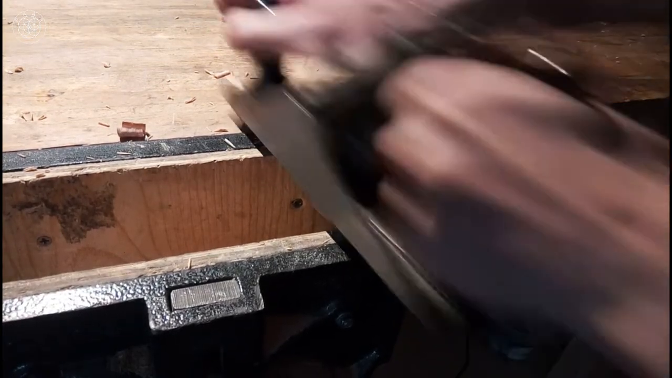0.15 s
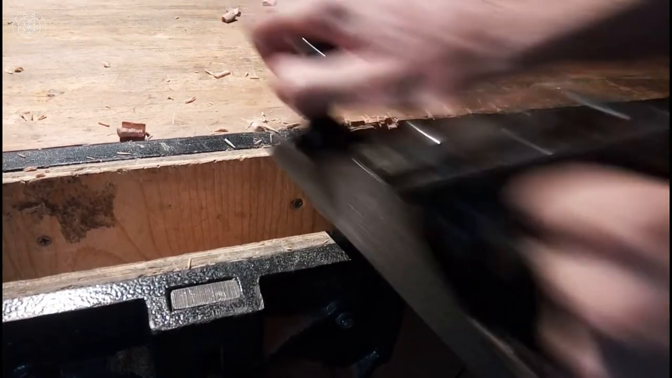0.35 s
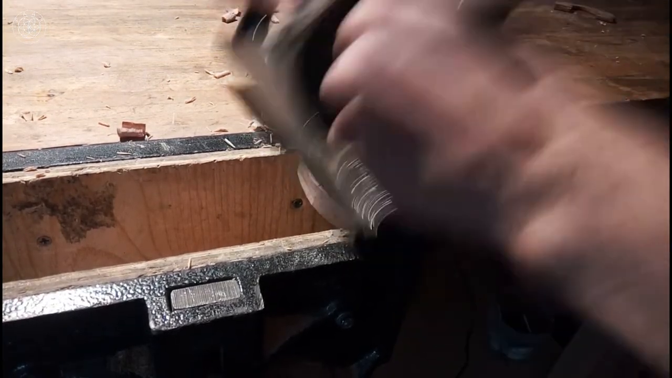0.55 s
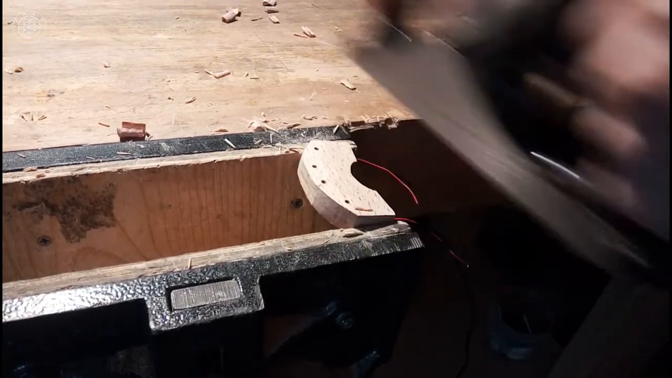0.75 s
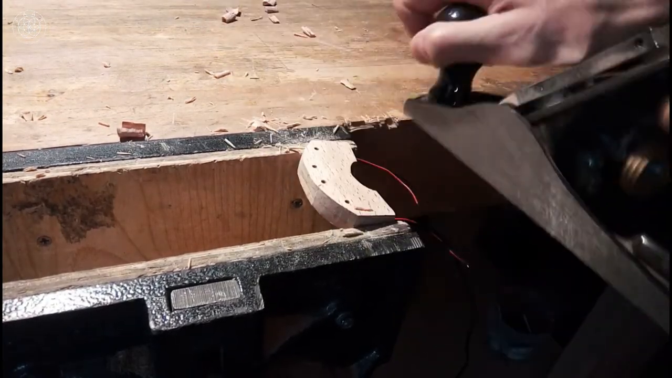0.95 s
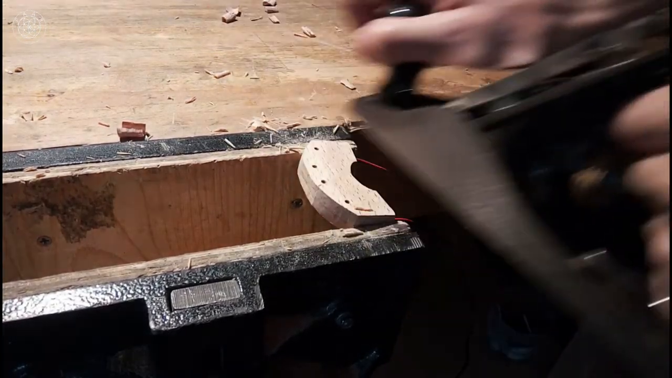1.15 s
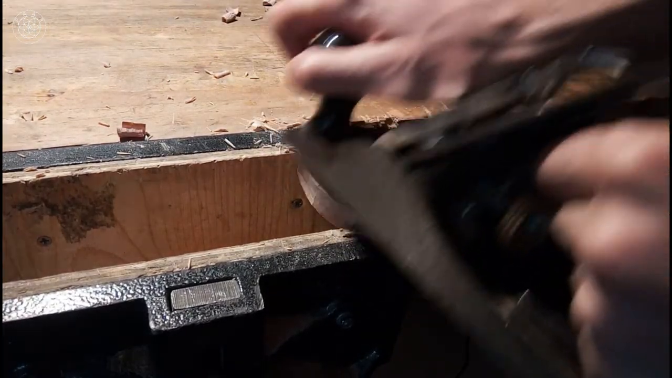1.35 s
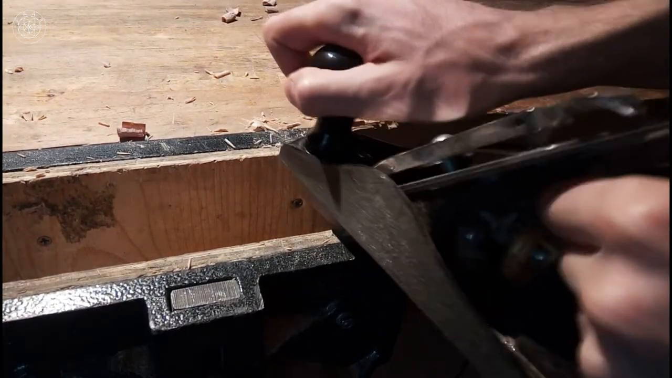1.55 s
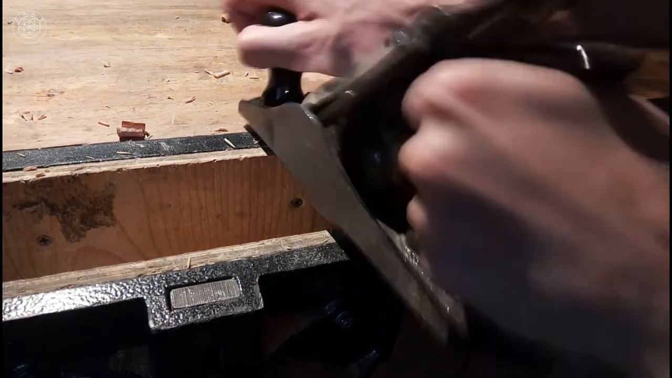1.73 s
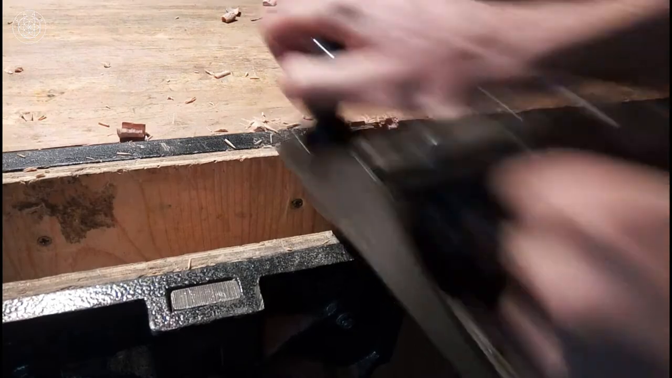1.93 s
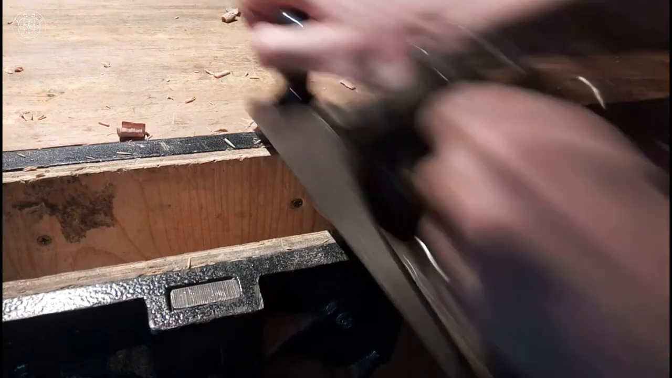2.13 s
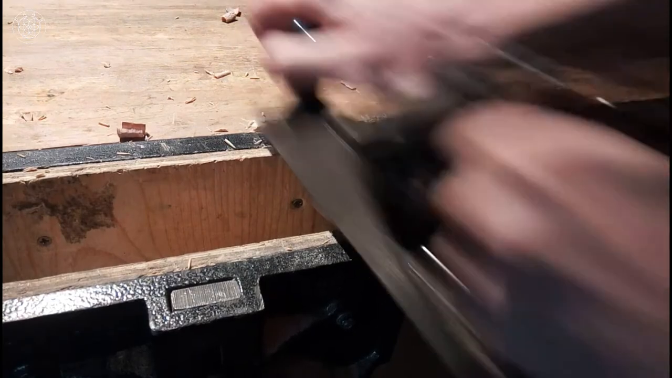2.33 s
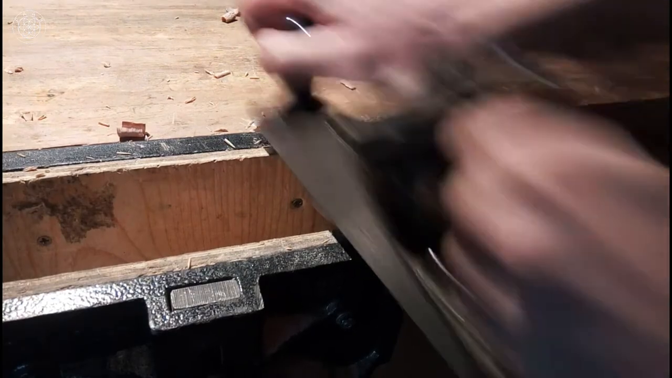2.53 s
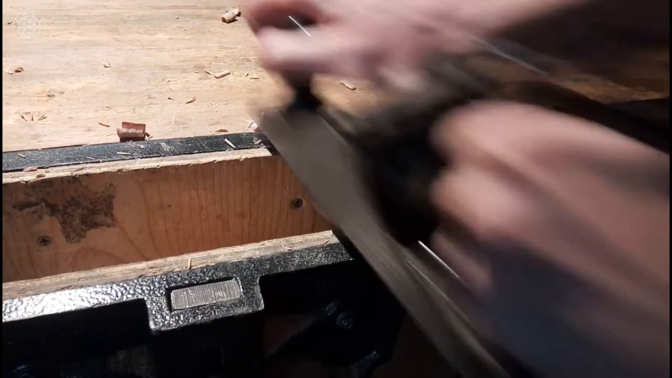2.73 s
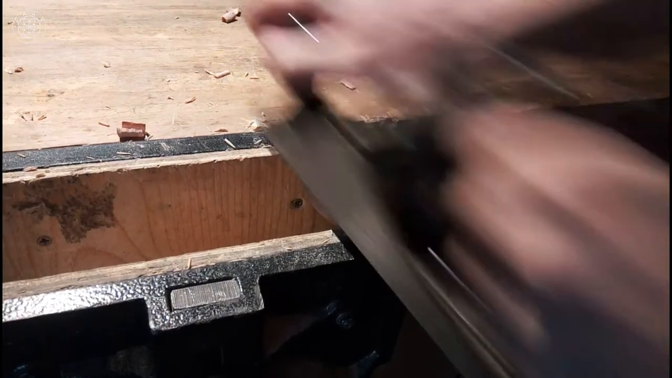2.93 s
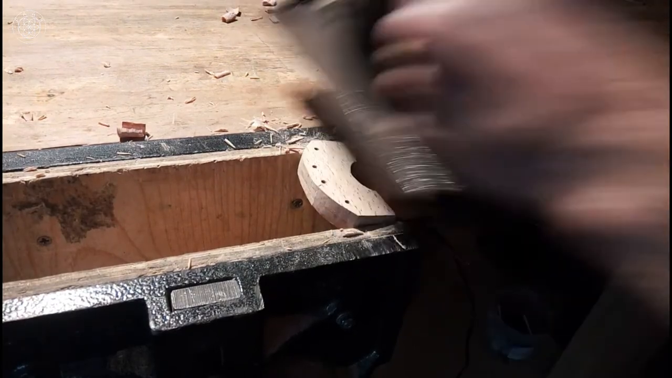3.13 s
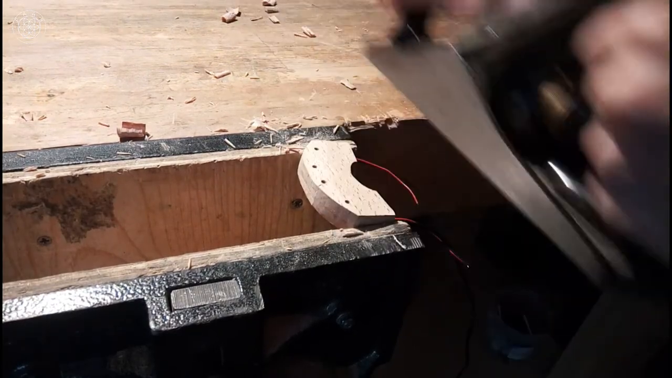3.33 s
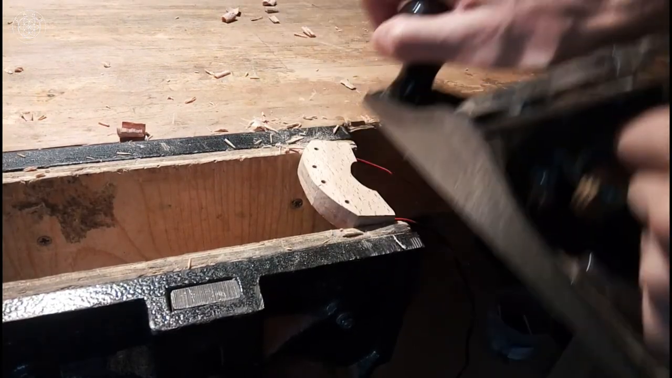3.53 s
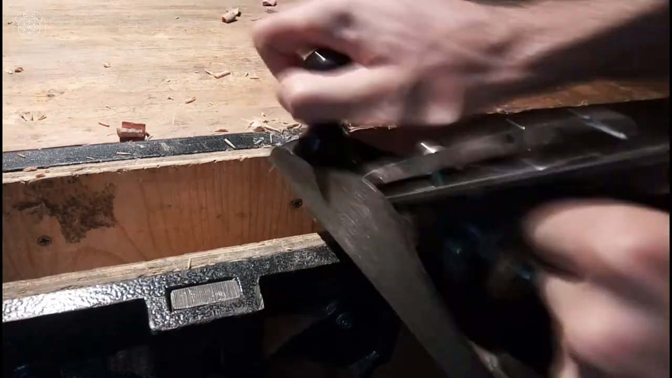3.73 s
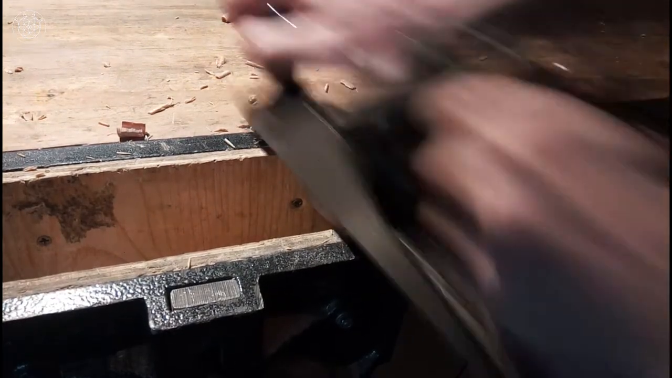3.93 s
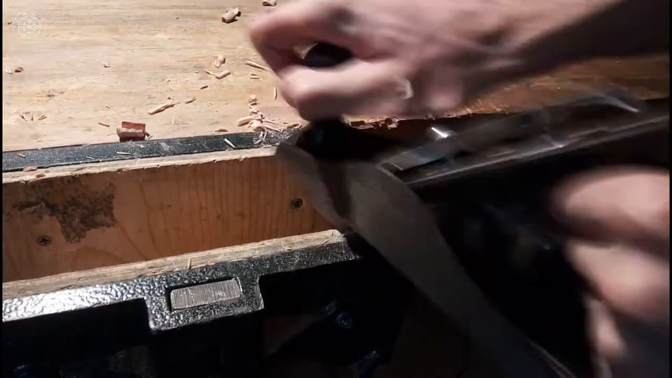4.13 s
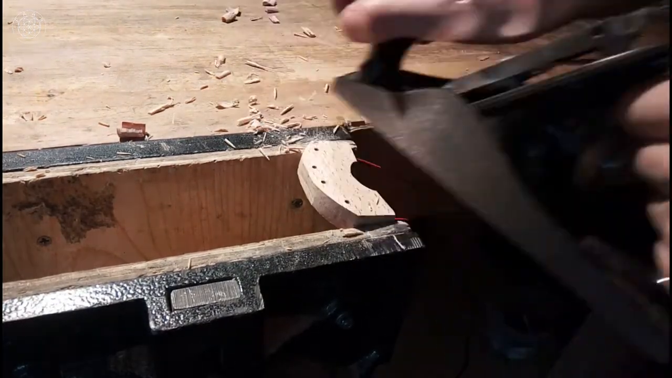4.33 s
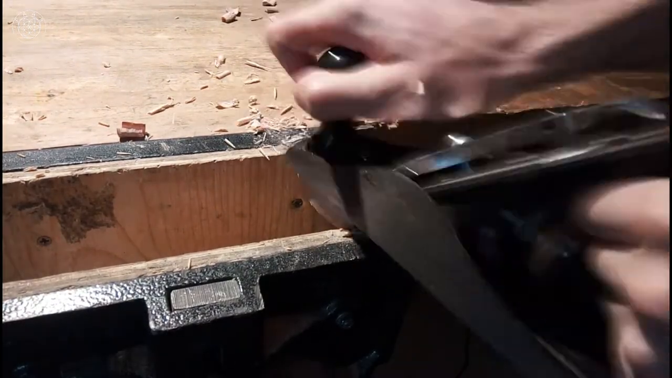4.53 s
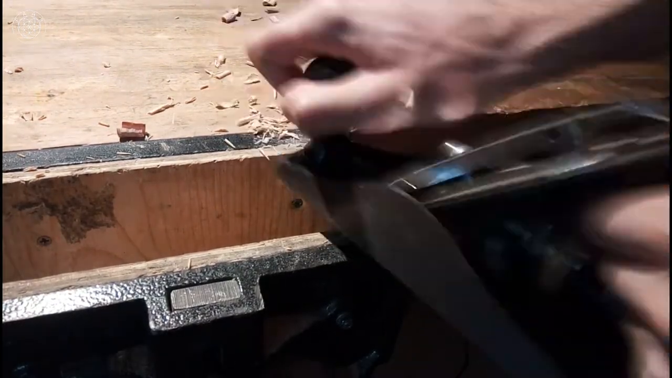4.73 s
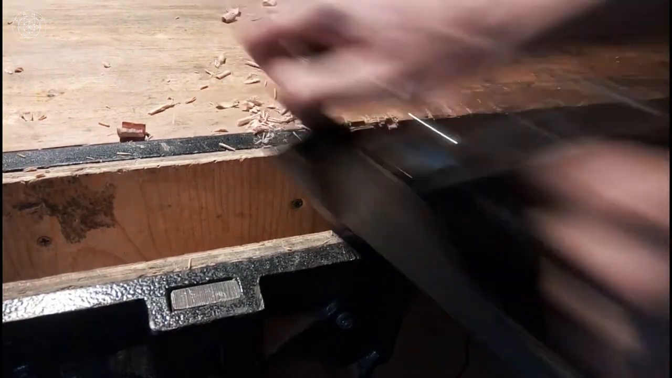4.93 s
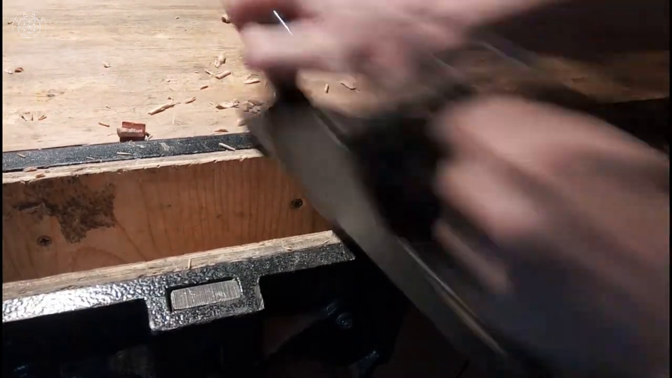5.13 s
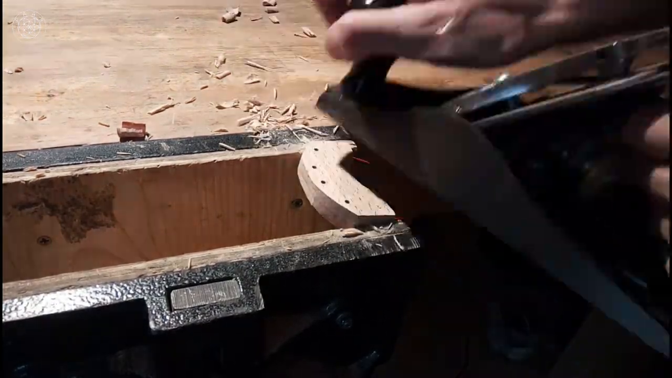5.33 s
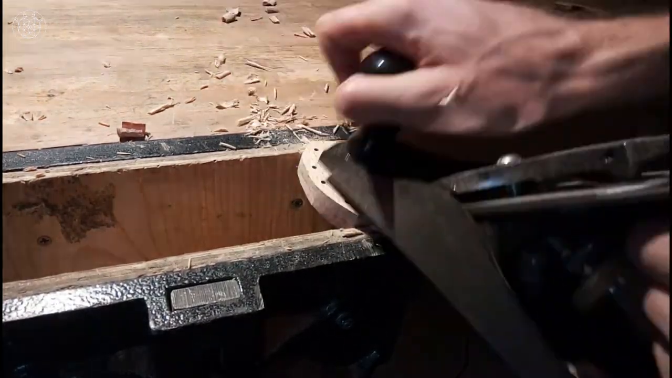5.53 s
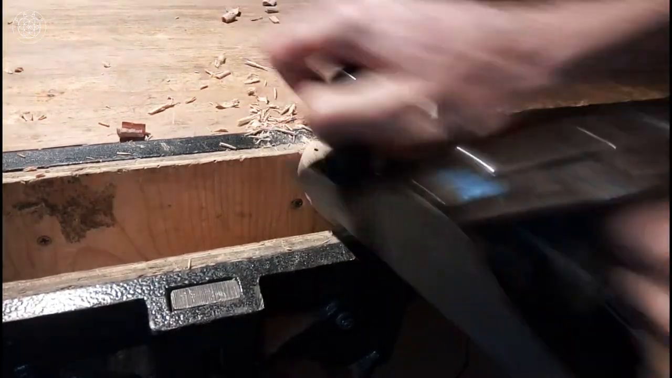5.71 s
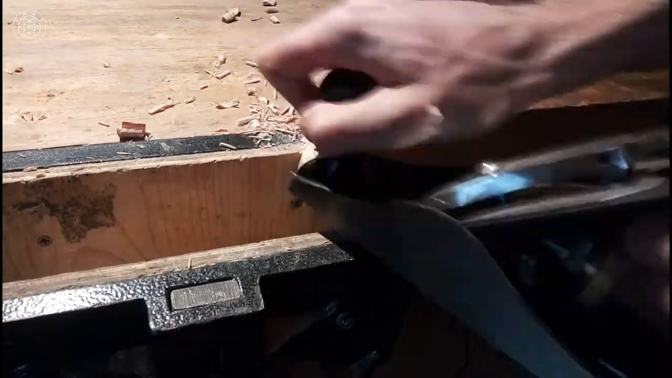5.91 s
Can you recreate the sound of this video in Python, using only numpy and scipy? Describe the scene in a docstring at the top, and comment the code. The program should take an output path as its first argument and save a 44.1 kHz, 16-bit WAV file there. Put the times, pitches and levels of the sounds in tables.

```python
"""Hand tools work a block of wood clamped in a bench vise. First come heavy strokes to and fro, dull
and roomy: the steel bites, rings and shakes the bench, and once the tool knocks on the block.
Then, from about 3.6 s, close and dry, a file chatters over the wood in short strokes, its teeth
slipping some seventy times a second and ringing its own modes. Along the way the wood catches and
tears with a hiss, over a faint bed of room tone."""
import sys
import numpy as np
from scipy import signal
from scipy.fft import rfft, irfft
from scipy.io import wavfile
from scipy.ndimage import uniform_filter1d

SR = 44100
rng = np.random.default_rng(int(sys.argv[2]) if len(sys.argv) > 2 else 0)


def log_audio(samples):
    """Write samples as a 16-bit WAV file to the path given in sys.argv[1]."""
    # one column per channel
    frames = np.atleast_2d(samples).T
    # limit to full scale, then quantise
    limited = np.clip(frames, -1, 1)
    pcm = np.round(limited * 32767).astype(np.int16)
    wavfile.write(sys.argv[1], SR, pcm)


N = 267687
T = np.arange(N) / SR

# Heavy passes over the block; decay_s is the t60 of bench and rumble, the block dies a little sooner:
# full_speed_s, hold_s, hiss_db, ring_db, block_db, bench_db, rumble_db, bench_lag_s, decay_s
HEAVY_PASSES = [(0, 0.0016, -32, -33.5, -44.5, -42.5, -55, 0.023, 0.86),
                (.175, 0.067, -47, -51.5, -45.5, -44, -49, 0.0088, 1.04),
                (0.408, .014, -32.5, -34.5, -47, -47, -55.5, 0.082, 1.3),
                (1.409, .01, -78, -57, -47.5, -36, -48.5, 0.016, 0.18),
                (1.654, 0.055, -48.5, -55.5, -53.5, -44, -59.5, .11, 0.63),
                (1.882, 0.091, -51, -55, -46, -43.5, -61, 0.03, 0.97),
                (2.131, 0.038, -42.5, -46, -47.5, -44.5, -54.5, 0.08, 1.2),
                (2.328, 0.083, -49.5, -56.5, -46.5, -44.5, -60.5, .004, 0.88),
                (2.567, 0.011, -37.5, -34.5, -44.5, -44.5, -55.5, 0.044, 1.8),
                (2.753, 0.073, -49.5, -52.5, -46, -53, -58, 0.012, 1.65),
                (2.964, 0.046, -42, -49.5, -47, -44.5, -48.5, .02, 0.17)]
# Steel biting or landing on the wood, with relative levels and a decay that each layer scales:
# start_s, hiss_db, ring_db, block_db, bench_db, rise_s, decay_s
STEEL_BITES = [(0.0034, -28, -51, -34.5, -43, 0.0039, 0.097),
               (0.1909, -65, -52.5, -37, -25.5, 0.0016, 0.13),
               (0.4052, -24, -36, -22.5, -32.5, 0.0034, 0.13),
               (1.4049, -45.5, -35, -21.5, -51, 0.0057, 0.13),
               (1.6604, -29.5, -54, -45, -62, 0.0018, 0.088), (1.717, -29, -27.5, -29, -41, 0.007, 0.29),
               (1.8503, -36.5, -43, -58, -72, 0.0042, 0.035), (1.9264, -35, -33, -39, -25.5, 0.0038, 0.067),
               (2.0427, -55, -44.5, -39, -35, 0.003, 0.15), (2.127, -23.5, -49, -49, -67, 0.0028, 0.36),
               (2.153, -44, -27, -33.5, -55, 0.0021, 0.32), (2.323, -78, -39, -29, -24, 0.0035, 0.12),
               (2.5621, -20, -47, -29, -35.5, 0.0013, 0.23), (2.7731, -61, -50, -40, -28.5, 0.0049, 0.27),
               (2.958, -19, -39, -39, -34, 0.0032, 0.13), (2.993, -55, -42, -27, -60, 0.0039, 0.072)]
# Resonances of the heavy tool, the bench and the file: pitch_hz, width_hz, level_db
STEEL_MODES = [(807, 18, 2), (1375, 28, -3), (1530, 30, -5), (1640, 36, 1), (1755, 25, -6), (1850, 18, -2),
               (1980, 20, -9), (2380, 40, -13), (2920, 50, -8), (3085, 40, -1), (3400, 70, 0),
               (3630, 60, -9), (3945, 35, -1), (4178, 45, -1), (4430, 50, -7), (4610, 35, -6),
               (5140, 60, -13), (5710, 60, -17), (5960, 90, -16), (6180, 90, -14), (7210, 68, -28),
               (8140, 80, -31)]
BENCH_MODES = [(83, 16, -4), (111, 20, -3), (179, 20, 0), (211, 18, 3), (257, 18, 2), (282, 16, 5),
               (339, 28, 2), (400, 28, 1), (452, 24, -1), (512, 24, 0), (641, 35, -1)]
FILE_MODES = [(1235, 40, -13), (1650, 90, -7), (2685, 95, -2.5), (3160, 105, -2.5), (4215, 110, 4.5),
              (4960, 190, -8), (5960, 170, -8), (7680, 110, -7), (7980, 90, -13), (8800, 130, -14),
              (9610, 100, -11), (9860, 120, -10), (11500, 90, -14), (12080, 140, -6), (15000, 300, -23)]
# Broad tone colour between the resonances: frequency_hz, level_db
HEAVY_COLOUR = [(25, -26), (100, -5), (270, -3), (550, -3), (800, -3.5), (1000, -12.5), (1600, -7.5),
                (2200, -16.5), (3000, -7), (4100, -6), (6600, -19), (7000, -34), (9000, -43.5),
                (16000, -49)]
FILE_COLOUR = [(25, -28), (270, -14), (624, -23.5), (1400, -15), (2000, -10), (2450, -5), (2900, -12),
               (3600, -4.5), (4600, -2.5), (6500, -8), (10800, -10), (12300, -5.5), (13300, -16),
               (15700, -19.5)]
# The tool's one knock on the block: start_s, level_db, pitch_hz, t60_s
TOOL_KNOCK = (1.4062, -23, 520, .035)
# Strokes of the file: land_s, lift_s, rasp_db, treble_offset_db, dip_before_grip_db
FILE_STROKES = [(3.608, 3.982, -46.5, -7.5, -10), (4.013, 4.291, -47, -8.5, -10),
                (4.332, 4.734, -47.5, -11.5, -6), (4.761, 5.023, -48, -10.5, -2),
                (5.073, 5.252, -47, -10.5, -3), (5.326, 5.491, -47.5, -10, -4),
                (5.507, 5.785, -46, -9.5, -31), (5.818, 5.989, -46.5, -12, -6), (6.022, 6.055, -71, -3, 3)]
# Strongest slips of the teeth: start_s, bright_ring_db, low_ring_offset_db, treble_offset_db
STRONG_SLIPS = [(3.6125, -28, -5, -3.5), (3.6276, -37.5, -15, 2.5), (3.6534, -34.5, -8, 2),
                (3.6838, -40, -15, 5), (3.72, -42, -16, 1), (3.7411, -41.5, -6, 8), (3.7507, -36, -2, -8),
                (3.779, -39.5, 1.5, 3), (3.8066, -34, -8, -1), (3.8348, -35.5, -1.5, -3),
                (3.849, -36, -14, 3), (3.8867, -37, -4, -5), (3.9022, -35, -6, 2.5), (3.912, -35, -6, -5),
                (3.9296, -39, 1, -11), (3.959, -34.5, -6, -5), (4.0152, -30.5, -2, 10),
                (4.0436, -39.5, 2, -16), (4.0855, -28.5, -10, -2.5), (4.1003, -36, -2, -7),
                (4.126, -38, 4.5, -3), (4.1638, -40, 2, 1), (4.1766, -37, -9, -3), (4.2336, -44, -1, 4),
                (4.247, -41.5, -2, 5), (4.2612, -34.5, -28, -2), (4.3341, -26, -4.5, 2.5),
                (4.3604, -41, -19, 4), (4.375, -38.5, -5, 1), (4.3855, -34, -1.5, -4),
                (4.4012, -39.5, 3, 0), (4.4412, -34, -6.5, -11), (4.457, -36, -8, -8), (4.4833, -39, 5, -8),
                (4.5126, -34, -10, -1), (4.5593, -40.5, 5, 2), (4.587, -38.5, -5, -4), (4.6117, -41, 1, -9),
                (4.6739, -49, 4.5, -28), (4.7106, -37, 0, -4), (4.7595, -34.5, 1, -9),
                (4.7761, -35, -5, -10), (4.803, -30.5, -8.5, -1.5), (4.8298, -40.5, -3, 9),
                (4.841, -36, -4, -8), (4.8703, -39.5, 2, 0.5), (4.903, -43.5, 6, 2), (4.9428, -43.5, 2, 0),
                (4.9728, -35.5, -3.5, -2), (5.0028, -37, 1.5, -2), (5.0747, -27, -4, -4),
                (5.1515, -45.5, 5, 5.5), (5.215, -32.5, -4, -2), (5.327, -32, -2.5, 2.5),
                (5.3589, -34.5, -14, -20), (5.4304, -38, -4, 1), (5.4453, -36, -22, 1),
                (5.5158, -37.5, -1.5, -11), (5.5448, -28.5, -9, -4), (5.59, -41, -16, -3),
                (5.62, -37, -22, 0), (5.6341, -32, -8, -0.5), (5.6466, -32.5, -2, -4), (5.6747, -31, -1, 2),
                (5.7036, -39, 5.5, 7.5), (5.735, -31.5, -3, -0.5), (5.752, -38.5, -3.5, 0),
                (5.8179, -29.5, -7, 2), (5.8322, -34, -5, -1), (5.8599, -45, 7.5, 7), (5.877, -39, -5, -21),
                (5.8918, -33.5, -2.5, -3), (5.9343, -35.5, 4, .5), (5.953, -32, -7, 1),
                (6.0296, -29, -5.5, -10.5)]
# Wood catching and tearing: start_s, length_s, level_db, centre_hz, width_octaves
WOOD_CATCHES = [(0.175, 0.0076, -41, 2300, 0.35), (2.32, 0.011, -44, 1940, 0.62),
                (2.771, 0.0061, -46, 1930, 0.6), (2.99, 0.012, -33.5, 4300, 0.37),
                (3.85, 0.058, -46, 5970, 0.52), (4.091, 0.035, -45.5, 4760, 0.53),
                (4.499, 0.075, -44, 5500, 1), (4.805, 0.067, -44.5, 5100, 0.81),
                (5.424, 0.047, -42.5, 4700, 0.6), (5.551, 0.028, -41.5, 1480, 0.81)]
# Reverb time of the workshop: frequency_hz, t60_s
SHOP_DECAY = [(100, 0.81), (700, 0.46), (1800, 0.033), (5000, 0.28)]
# Colour of the room tone, far and close: frequency_hz, level_db
FAR_ROOM_COLOUR = [(25, -32.5), (70, -14), (130, -14.5), (250, -16), (600, -21.5), (1500, -25),
                   (3000, -28.5), (6200, -33), (7000, -43.5), (9000, -46.5), (16000, -44.5)]
NEAR_ROOM_COLOUR = [(25, -46), (100, -25.5), (300, -21), (550, -21.5), (1500, -17.5), (3200, -17),
                    (7000, -27), (15000, -26)]
# Wavering low tones far off, a faint whistle up close: pitch_hz, width_hz, level_db
FAR_HUMS = [(161, 26, -71.5), (219.6, 6.1, -71.5)]
NEAR_WHISTLE = [(3170, 70, -77)]

HEAVY_LIFTS_S = [0.764, 3.24]  # the heavy tool leaves the block
SLIPS_PER_S, GRIP_S = 70, 0.033  # pace of the chatter; time for the teeth to take hold
CLOSE_UP_S = 3.58


def heavy_strokes():
    """Sliding and biting steel drives six layers: hiss, ring, block, bench, rumble and top air."""
    edges_hz = [1, 145, 400, 1050, 2450, 6900, 30000]
    layer_bands = [4, 3, 2, 1, 0, 5]
    modes = STEEL_MODES + BENCH_MODES
    free_body = resonator(modes, HEAVY_COLOUR, -4.5, edges_hz)[layer_bands]
    pressed_body = resonator(modes, HEAVY_COLOUR, -1, edges_hz)[layer_bands]  # on wood it rings less
    slide = pass_envelopes() * grit(6, coarse_db=4.5, clump_db=2, clump_s=.008)
    strokes = (excite(free_body, bites()) + excite(pressed_body, slide)).sum(0) + tool_knock()
    return strokes + amp(-12) * shop_reverb(strokes)


def pass_envelopes():
    """Gains of the six sliding layers: the steel speaks quickly, the wood lags and lingers."""
    approach_db, top_air_db = -42.5, -65.5
    cut_db_s, wood_rise_db_s, hiss_fall_db_s, lift_db_s = 899, 651, 252.5, 300
    power = np.zeros((5, N))
    for start, hold, hiss_db, ring_db, block_db, bench_db, rumble_db, lag, decay in HEAVY_PASSES:
        # A soft slide swells slowly; the cut itself sets in fast.
        approach = swell(start, hold, min(hiss_db, approach_db), 278, hiss_fall_db_s)
        hiss = np.maximum(approach, swell(start, hold, hiss_db, cut_db_s, hiss_fall_db_s))
        ring = swell(start + .0018, hold, ring_db, cut_db_s, fall_db_s=209)
        ring_tail = swell(start, hold, ring_db - 18, cut_db_s, fall_db_s=89)
        block = swell(start + .004, hold, block_db, wood_rise_db_s, 75 / decay)
        bench = swell(start + lag, hold, bench_db, wood_rise_db_s, 60 / decay)
        rumble = swell(start + lag, hold, rumble_db, wood_rise_db_s, 60 / decay)
        lift_s = min(s for s in HEAVY_LIFTS_S if s > start)
        lift_fade = amp(-lift_db_s * np.maximum(T - lift_s, 0)) ** 2
        power += lift_fade * [hiss, ring + ring_tail, block, bench, rumble]
    gains = np.sqrt(power)
    top_air = amp(top_air_db) * (gains[0] / amp(approach_db)) ** 1.2  # swings wider than the hiss
    return np.vstack([gains, top_air])


def bites():
    """Each bite of the steel is one blow inside a burst of grit, across the six layers."""
    power, blows = np.zeros((2, 6, N))
    tightness = np.array([[1.4], [1], [.9], [.8], [.8], [1.8]])  # high layers die sooner
    for start, hiss_db, ring_db, block_db, bench_db, rise, decay in STEEL_BITES:
        layer_db = np.array([hiss_db, ring_db, block_db, bench_db, bench_db - 12.5, hiss_db - 17.5])
        gain = amp(layer_db - 10)[:, None]
        add(power, start, (gain * burst(rise, decay) ** tightness) ** 2)
        add(blows, start + rise, gain * amp(17.5))
    return np.sqrt(power) * grit(6, coarse_db=1, clump_db=3.5, clump_s=.011) + blows


def tool_knock():
    """The tool knocks on the block: one short, damped tone."""
    start, level_db, pitch_hz, t60 = TOOL_KNOCK
    envelope = amp(level_db) * burst(.002, t60)
    out = np.zeros(N)
    add(out, start, envelope * np.sin(2 * np.pi * pitch_hz * T[:len(envelope)]))
    return out


def file_strokes():
    """Rasp and slipping teeth drive the file in four layers: wood knock, low ring, bright ring, treble."""
    landings, lifts, stroke_db, treble_db, dip_db = np.transpose(FILE_STROKES)
    stroke = np.maximum(np.searchsorted(landings, T) - 1, 0)
    loose = np.clip(1 - (T - landings[stroke]) / GRIP_S, 0, 1)
    rasp_db = stroke_db[stroke] + dip_db[stroke] * loose + contact_db(landings, lifts, fade_s=.038)
    layer_db = np.array([rasp_db - 13.5, rasp_db - 8, rasp_db - 5.5, rasp_db + treble_db[stroke]])
    rasp = amp(layer_db + 1.2) * grit(4, coarse_db=-2, clump_db=3.5, clump_s=.0036)
    chatter, snaps = tooth_slips(landings, layer_db)
    edges_hz = [800, 2200, 3600, 7000, 30000]
    ring = excite(resonator(FILE_MODES, FILE_COLOUR, -8, edges_hz), chatter + snaps)
    rub = excite(resonator(FILE_MODES, FILE_COLOUR, -3.5, edges_hz), rasp)
    low_body = resonator(FILE_MODES, FILE_COLOUR, 0, [1, 800])[0]
    bench_thud = excite(low_body, rasp[1] * amp(-14) + snaps[0] * amp(-10))
    # The ring cuts off abruptly at each stroke's end.
    stroke_gate = amp(contact_db(landings - .01, lifts + .0026, fade_s=.015))
    return (ring + rub).sum(0) * stroke_gate + bench_thud


def tooth_slips(landings, layer_db):
    """Gritty chatter and snaps of steel meeting wood; weak slips fill the gaps between strong ones."""
    power, snaps = np.zeros((2, 4, N))
    scatter = rng.standard_normal((len(STRONG_SLIPS), 12, 5))
    tightness = np.array([[.9], [1], [1.1], [1.4]])

    def slip(start, level_db, rise_s, decay_s):
        """Adds the power of one slip; its treble dies sooner."""
        add(power, start, (amp(level_db)[:, None] * burst(rise_s, decay_s) ** tightness) ** 2)

    next_starts = [row[0] for row in STRONG_SLIPS[1:]] + [N / SR]
    for (start, bright_db, low_db, treble_db), next_s, jitter in zip(STRONG_SLIPS, next_starts, scatter):
        slip_db = bright_db + np.array([low_db - 6.5, low_db, 0, treble_db])
        on_landing = abs(landings - start).min() < .015
        rise_s, decay_s, snap_db = (.0009, .017, 13) if on_landing else (.0028, .02, 1.5)
        slip(start, slip_db, rise_s, decay_s)
        add(snaps, start + .0004, amp(slip_db + snap_db)[:, None])
        gap_s = next_s - start
        steps = min(round(gap_s * SLIPS_PER_S), 12)
        for k in range(1, steps):
            weak_s = start + gap_s * k / steps + .002 * jitter[k, 0]
            weak_db = layer_db[:, round(weak_s * SR)] + 11 + 2.9 * jitter[k, 1:]
            slip(weak_s, weak_db, rise_s=.002, decay_s=.023)
    return np.sqrt(power) * grit(4, coarse_db=3, clump_db=3.1, clump_s=.00038), snaps


def wood_catches():
    """The wood catches and tears in short swells of broad hiss."""
    out = np.zeros(N)
    hz = np.fft.rfftfreq(4096, 1 / SR)
    for start, length_s, level_db, centre_hz, octaves in WOOD_CATCHES:
        band = np.exp(-.5 * (np.log2((hz + 1) / centre_hz) / octaves) ** 2)
        hiss = shaped_noise(band, 4096)[:round(length_s * SR)]
        add(out, start, amp(level_db) * hiss * signal.windows.tukey(len(hiss), .5))
    return out


def shop_reverb(sound):
    """Sparse workshop reflections of random sign, each band dying at its own speed."""
    taps = np.zeros(SR)
    arrivals = np.arange(200, SR - 20, 20) + rng.integers(0, 20, (SR - 201) // 20)
    taps[arrivals] = rng.choice([-1., 1.], arrivals.shape)
    hz, t, bands = signal.stft(taps, SR, nperseg=256)
    decay = amp(-60 * t / curve(SHOP_DECAY, hz)[:, None])
    tail = signal.istft(bands * decay, SR, nperseg=256)[1]
    return excite(tail / np.linalg.norm(tail), sound)


def room_tone(colour, tones, level_db):
    """A steady bed of air with fuzzy tones of narrow noise."""
    hz = np.fft.rfftfreq(N, 1 / SR)
    bed = amp(level_db) * shaped_noise(amp(curve(colour, hz)), N)
    for pitch_hz, width_hz, tone_db in tones:
        bed += amp(tone_db) * shaped_noise(peak(hz, pitch_hz, width_hz), N)
    return bed


def resonator(modes, colour, colour_db, edges_hz):
    """A body's modes over its broad colour: one impulse response of unit energy for each band."""
    hz = np.fft.rfftfreq(8192, 1 / SR)
    power = amp(curve(colour, hz) + colour_db) ** 2
    for pitch_hz, width_hz, level_db in modes:
        power += amp(level_db) ** 2 * peak(hz, pitch_hz, width_hz) ** 1.5
    responses = []
    for low, high in zip(edges_hz, edges_hz[1:]):
        band = 1 / (1 + (low / (hz + 1)) ** 24) / (1 + (hz / high) ** 24)
        cepstrum = irfft(.5 * np.log(power * band + 1e-14))
        cepstrum[1:4096] *= 2  # minimum phase: the ring follows the hit
        cepstrum[4097:] = 0
        taps = irfft(np.exp(rfft(cepstrum)))[:4096]
        responses.append(taps / np.linalg.norm(taps))
    return np.array(responses)


def excite(response, drive):
    """Plays a drive through an impulse response, layer by layer."""
    return signal.fftconvolve(drive, response, axes=-1)[..., :N]


def grit(layers, coarse_db, clump_db, clump_s):
    """Tearing fibres: noise whose grains vary in size and come in clumps."""
    clumps = unit_rms(uniform_filter1d(rng.standard_normal((layers, N)), round(clump_s * SR), axis=1))
    noise = rng.standard_normal((layers, N))
    return unit_rms(noise * amp(coarse_db * rng.standard_normal(N) + clump_db * clumps))


def contact_db(landings, lifts, fade_s):
    """Stroke envelope: 0 dB during each stroke, a fade at its end, silence in between."""
    out = np.full(N, -130.)
    for start, end in zip(landings, lifts):
        touching = (T >= start) & (T <= end)
        out[touching] = 20 * np.log10(np.clip((end - T[touching]) / fade_s, 1e-4, 1))
    return out


def swell(peak_s, hold_s, level_db, rise_db_s, fall_db_s):
    """Power envelope that climbs, holds and sinks at steady dB rates."""
    rise_db = rise_db_s * np.maximum(peak_s - T, 0)
    fall_db = fall_db_s * np.maximum(T - peak_s - hold_s, 0)
    return amp(level_db - rise_db - fall_db) ** 2


def burst(rise_s, t60_s):
    """Envelope of a short scrape: curved attack, exponential decay."""
    t = np.arange(round(min(rise_s + t60_s, .4) * 1.6 * SR)) / SR
    return np.clip(t / rise_s, 0, 1) ** 2 * amp(-60 * np.maximum(t - rise_s, 0) / t60_s)


def shaped_noise(spectrum, samples):
    """Noise of rms 1 coloured by a spectrum."""
    return unit_rms(irfft(rfft(rng.standard_normal(samples)) * spectrum, samples))


def peak(hz, pitch_hz, width_hz):
    """A resonance peak of height 1."""
    return 1 / (1 + (2 * (hz - pitch_hz) / width_hz) ** 2)


def curve(points, hz):
    """Interpolates a table on a log frequency axis."""
    points_hz, values = np.transpose(points)
    return np.interp(np.log(hz + 1), np.log(points_hz + 1), values)


def add(mix, start_s, sound):
    """Lays a sound into the mix."""
    part = mix[..., round(start_s * SR):][..., :sound.shape[-1]]
    part += sound[..., :part.shape[-1]]


def amp(db):
    """Decibels to gain."""
    return 10 ** (np.asarray(db) / 20)


def unit_rms(x):
    """Scales to rms 1."""
    return x / np.sqrt(np.mean(x ** 2) + 1e-20)


def scene():
    """Distant heavy strokes cut to close filing, each over its own room tone."""
    far = heavy_strokes() + room_tone(FAR_ROOM_COLOUR, FAR_HUMS, level_db=-71)
    near = file_strokes() + room_tone(NEAR_ROOM_COLOUR, NEAR_WHISTLE, level_db=-73)
    crossfade = np.clip((T - CLOSE_UP_S) / .0042, 0, 1)
    return ((1 - crossfade) * far + crossfade * near + wood_catches())[None]


def record(dry):
    """A steep high cut at 15.9 kHz."""
    high_cut = signal.firwin(511, 15900, window=("kaiser", 9), fs=SR)
    return signal.oaconvolve(dry, high_cut[None], "same")


dry = scene()
out = record(dry)
log_audio(out)
```